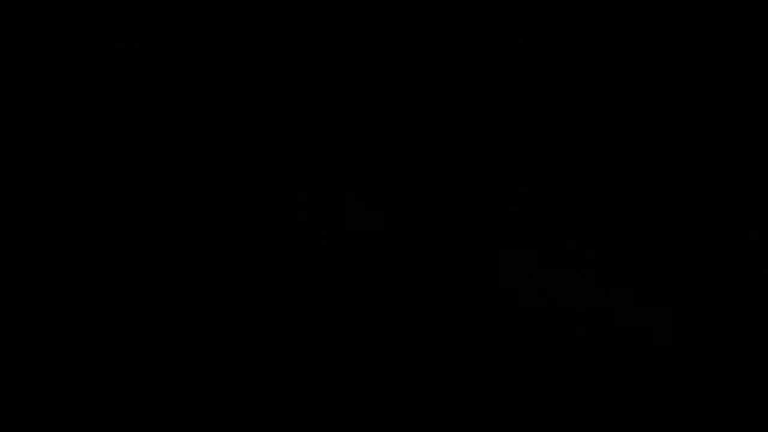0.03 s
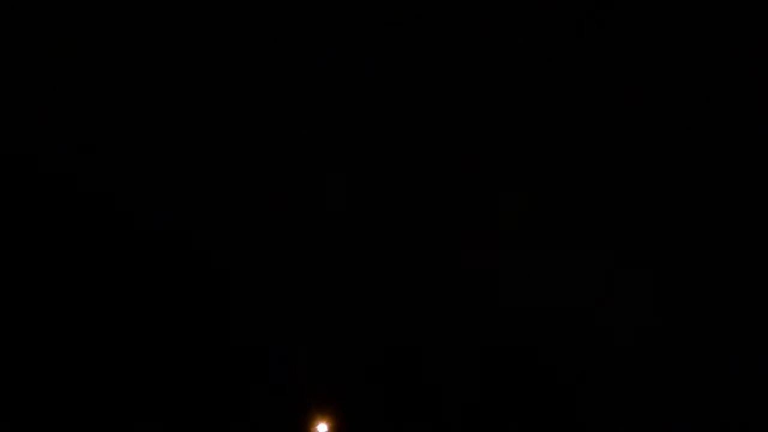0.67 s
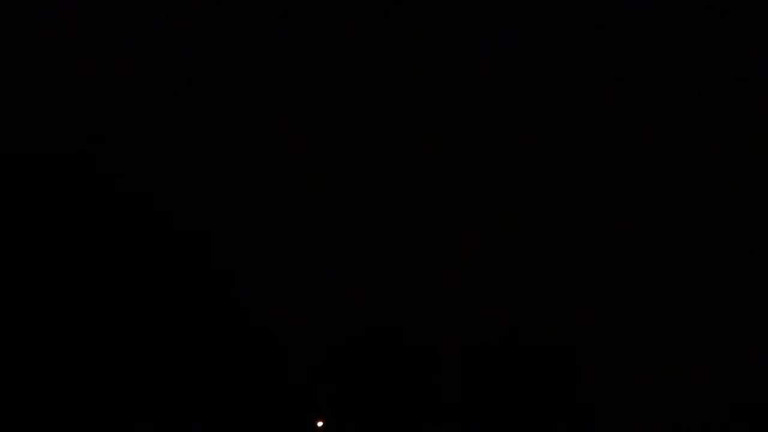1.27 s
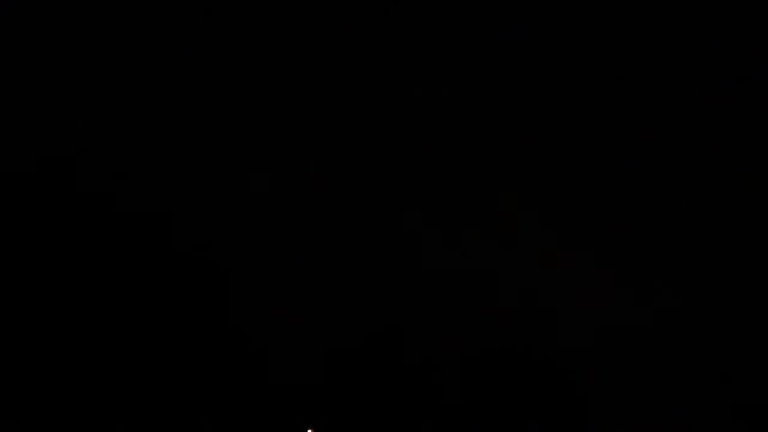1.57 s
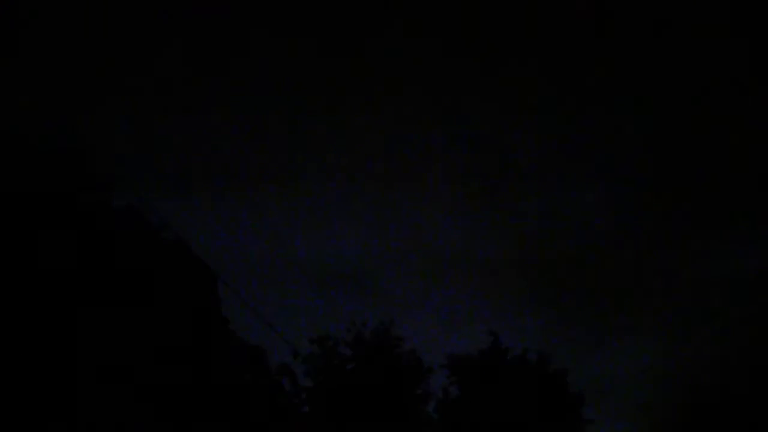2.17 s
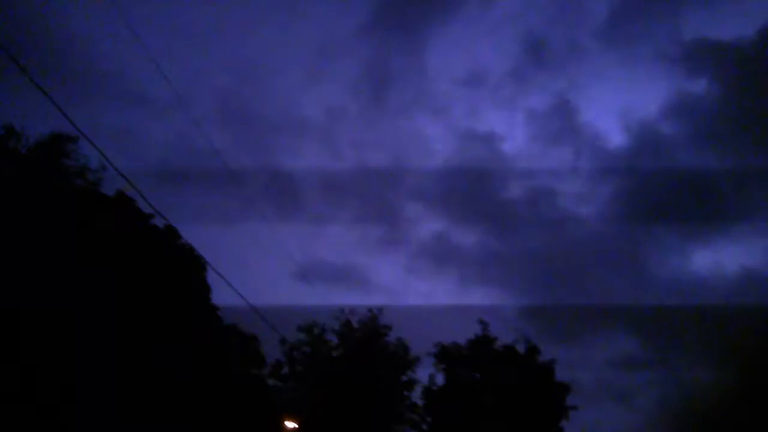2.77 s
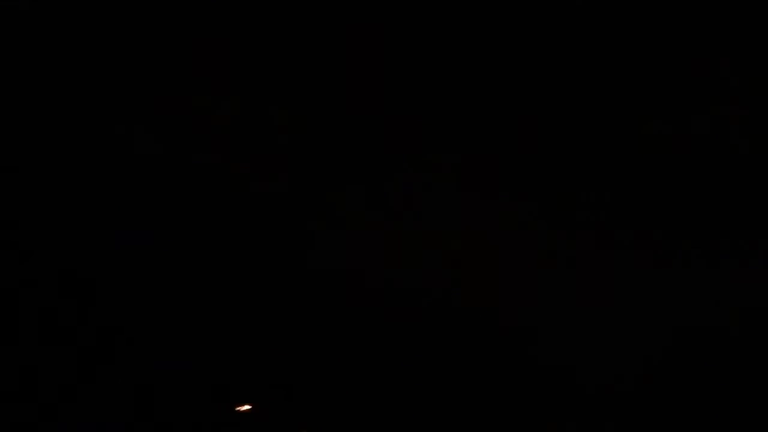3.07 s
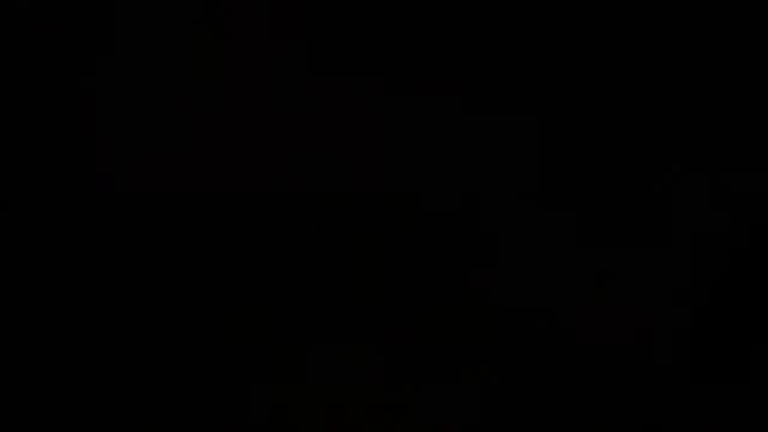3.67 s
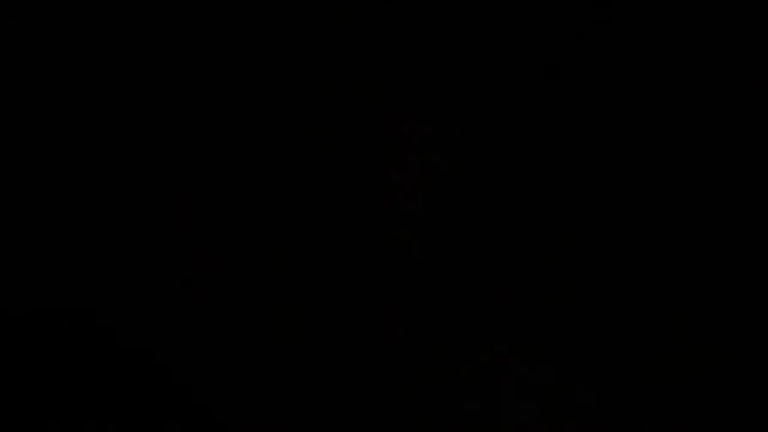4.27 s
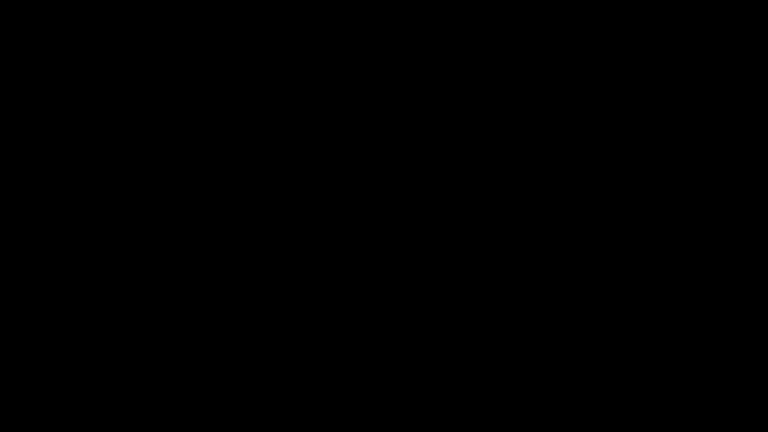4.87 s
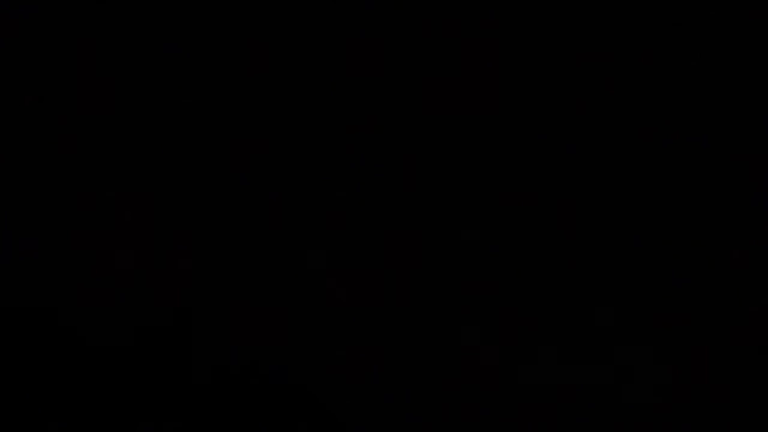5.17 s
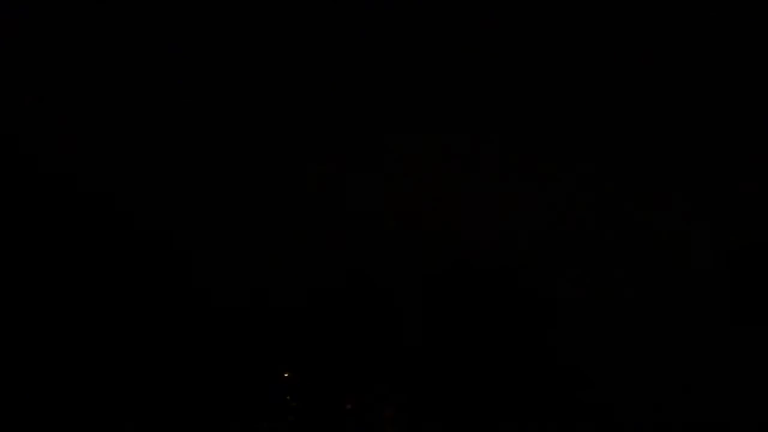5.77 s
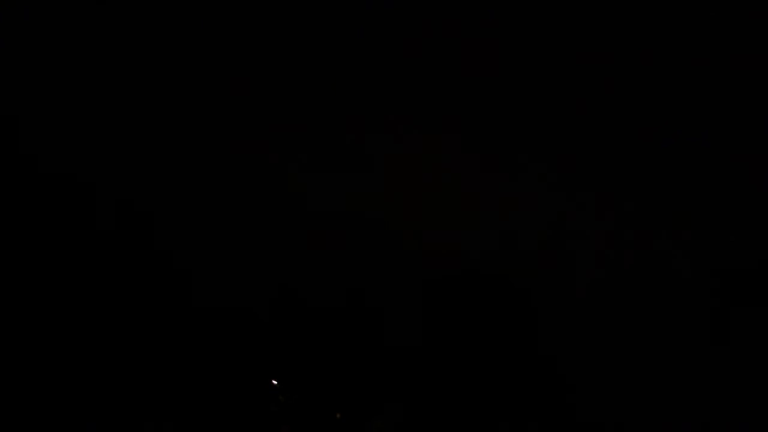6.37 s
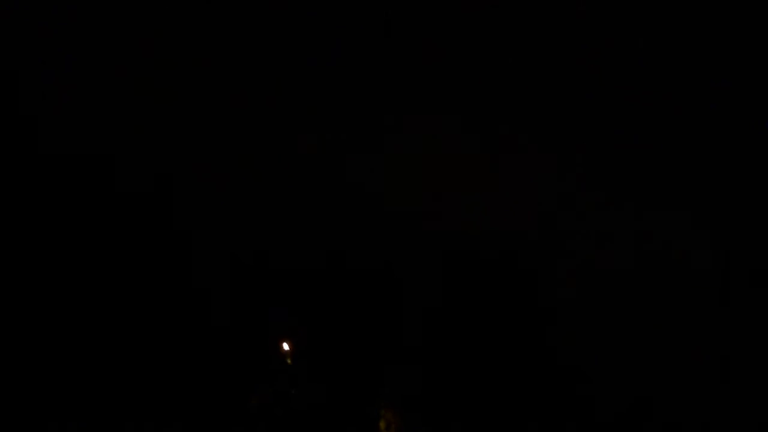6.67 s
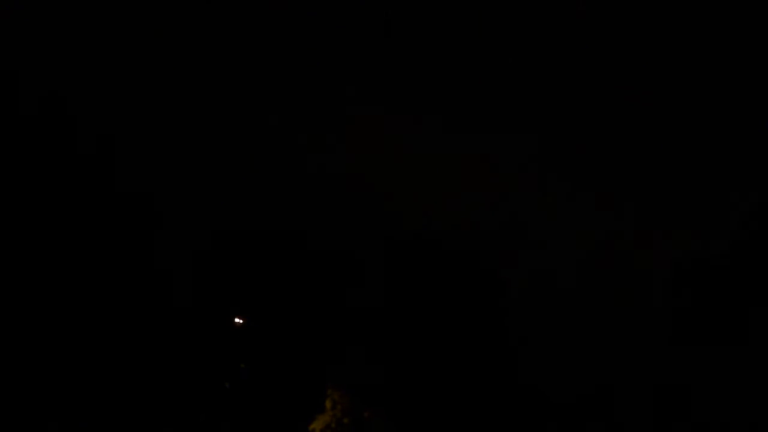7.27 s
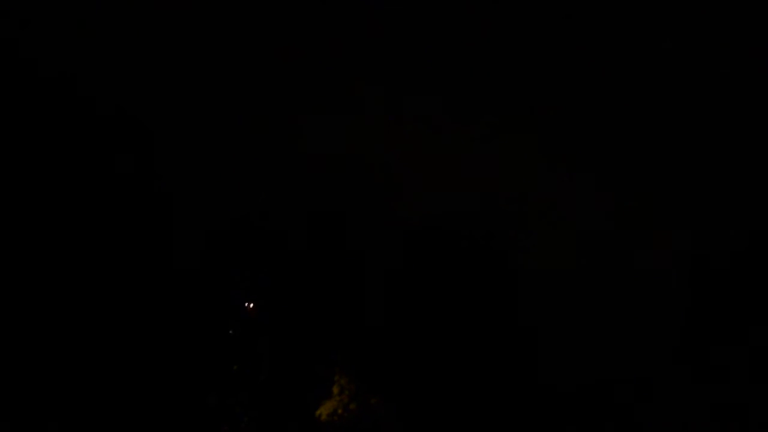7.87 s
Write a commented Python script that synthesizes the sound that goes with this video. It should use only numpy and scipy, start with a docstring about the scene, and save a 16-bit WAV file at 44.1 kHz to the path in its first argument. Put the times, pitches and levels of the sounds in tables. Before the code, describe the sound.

A soft, steady hiss of light rain on trees and ground runs for about eight seconds, heard outdoors at night through one microphone on a hand-held camera. Throughout, large drops land close by at irregular moments, ticking sharply, spattering on leaves and now and then plinking faintly in puddles. Some strike the casing with dull, clicking knocks: one at 0.5 seconds, a loud one at 2.8, another at 3.5, and a run of lighter taps until about 4.3. A bright splash comes at 4.8. Around 5.3 to 5.4 seconds the camera swings round with a short finger rub and a quick cluster of loud bumps; afterwards the hiss is slightly quieter, thinner and brighter. At 5.9 one drop snaps sharply right on the microphone. Scattered ticks continue, with a crisp one near 7.8 seconds.

```python
"""A soft hiss of light night rain on trees and ground, all around a hand-held camera with one microphone.
Close by, large drops tick as they burst, spatter on leaves and plink in puddles; some knock on the casing.
The camera is swung round with a short rubbing jolt, and facing the new way the hiss is thinner and
brighter. Just after the swing, one drop snaps right on the microphone."""
import sys
import numpy as np
from scipy import signal
from scipy.fft import rfft, irfft, next_fast_len
from scipy.io import wavfile
from scipy.ndimage import map_coordinates

SR = 44100
rng = np.random.default_rng(int(sys.argv[2]) if len(sys.argv) > 2 else 0)


def store_pcm(level_fs):
    """Save levels as 16-bit WAV."""
    pcm = np.round(np.clip(level_fs, -1, 1) * 32767).astype(np.int16)
    wavfile.write(sys.argv[1], SR, np.atleast_2d(pcm).T)


N = 349713
TOP_HZ = 15550  # the camera's band limit

# colour of the far rain before the swing: (frequency [Hz], relative level [dB])
HISS_FACING = [(25, -36), (50, -19.5), (100, -10), (180, -4.5), (450, -3), (750, -1), (1200, 0.5),
               (2700, -1.5), (4000, -5.5), (6800, -8.0), (9500, -11), (11500, -15.5), (13300, -19.5),
               (15200, -20.0)]
# colour of the far rain after the swing: (frequency [Hz], relative level [dB])
HISS_TURNED = [(25, -31.5), (50, -20), (100, -9.5), (180, -4), (450, -1.0), (750, -0.5), (1200, 0.0),
               (2700, -3.0), (4000, -6.5), (6800, -7), (9500, -7.0), (11500, -10), (13300, -13.5),
               (15200, -17)]
# slow rise and fall of the hiss's treble: (time [s], gain [dB])
TREBLE_DRIFT = [(0, -.6), (1.2, 0), (2.35, -.4), (2.65, 1.5), (2.9, 1.5), (3.05, -0.5), (3.85, -1.3),
                (4.2, .3), (4.7, .2), (4.9, .8), (5.4, 1.2), (5.7, 0), (7.2, -.5), (7.7, .6)]
# large drops bursting close by: (time [s], level [dB], pitch [Hz], swell [cycles])
NEAR_TICKS = [(.5081, -36, 4200, .6), (.865, -31, 9000, 1.1), (1.179, -36, 2600, 1.8),
              (2.056, -30, 6500, 1.1), (2.4117, -31.5, 7400, 1.4), (2.679, -30, 2930, 2),
              (3.448, -34, 3130, 1.9), (3.727, -27.5, 5800, 1), (3.988, -34, 3300, 1.7),
              (4.080, -34, 3200, 2), (4.094, -29.5, 6000, 1.1), (4.2328, -25.5, 7000, 1),
              (4.3005, -27, 7000, 1), (4.813, -24, 3200, .3), (4.8217, -26, 4400, .6),
              (4.8498, -31, 11500, 1.3), (5.1835, -29, 13000, 1.1), (5.1832, -25.5, 5500, 1),
              (5.2435, -32, 6500, 1), (5.2605, -30, 4200, .8), (6.124, -33, 6800, 1.1),
              (6.5122, -31, 5000, 1.6), (6.9238, -28.5, 10000, .9), (6.9242, -28, 4000, .55),
              (7.116, -32, 9500, 1.1), (7.163, -29, 11000, 1), (7.237, -34, 2400, .8),
              (7.6155, -31, 9000, .7), (7.7825, -28.5, 5100, 1.4), (7.7823, -19.5, 11200, 1.1)]
# bubbles ringing in puddles: (time [s], level [dB], pitch [Hz], swell [cycles])
PUDDLE_PLINKS = [(2.3988, -39, 2950, 3.5), (2.4018, -35, 2800, 3), (4.8216, -34, 4000, 4.5),
                 (4.8271, -31.5, 3150, 3), (7.6276, -37.8, 3300, 3.3)]
# drops breaking up on leaves: (time [s], mean droplet level [dB], centre pitch [Hz], length [s])
LEAF_SPATTERS = [(.86, -43, 9000, .05), (2.054, -42, 4200, .008), (2.412, -43, 7000, .012),
                 (2.85, -40, 6800, .04), (4.288, -40, 3000, .012), (4.44, -41, 3600, .018),
                 (4.8225, -40, 4000, .009), (5.2495, -38.5, 3700, .008), (6.36, -45, 5600, .015),
                 (7.62, -43.5, 4600, .022)]
# blows on the casing from drops and the hand; heavy drops strike twice: (time [s], thud level [dB],
# thud pitch [Hz], thud swell [cycles], boom level [dB], boom pitch [Hz], click level [dB])
CASING_KNOCKS = [(.0706, -32, 407, 1.3, -52, 340, -41), (.434, -38, 520, .8, -50, 340, -40),
                 (.50778, -30, 245, .77, -33, 361, -19), (.51199, -39.6, 445, 1.46, -29, 355, -32),
                 (.8146, -34.5, 600, 0.83, -39, 300, -38), (2.6784, -27.5, 730, 0.41, -44, 340, -28),
                 (2.80269, -24, 631, .88, -14.2, 217, -21.5), (2.80545, -13.5, 411, .65, -13.4, 238, -26),
                 (3.1614, -42, 1350, 1.1, -43, 340, -27), (3.187, -35.5, 610, 1.4, -44, 340, -44),
                 (3.2756, -40, 600, 0.85, -39, 340, -27), (3.310, -33, 860, .65, -41, 340, -38),
                 (3.388, -33.5, 704, .76, -36, 340, -28), (3.4578, -38, 560, .66, -44, 340, -34),
                 (3.4736, -25.5, 797, 1.22, -16.2, 440, -23),
                 (3.47698, -36.3, 565, 1.08, -20.8, 445, -35.3), (3.764, -29, 1100, .85, -39, 340, -34),
                 (3.7683, -32.5, 596, 0.88, -46, 342, -35), (3.9075, -39.5, 620, 1.5, -44, 340, -46),
                 (3.959, -26, 700, .3, -40, 340, -28), (3.9698, -27, 700, 0.45, -44, 340, -23.5),
                 (4.2322, -22.5, 1100, 0.72, -33.5, 400, -33), (4.2996, -26.5, 850, .72, -36, 340, -31),
                 (4.303, -34, 620, .85, -40, 340, -40), (4.343, -39, 600, 1.1, -50, 340, -42),
                 (5.2203, -32, 1200, .85, -50, 340, -36), (5.3005, -34, 620, .9, -42, 340, -36),
                 (5.3363, -32, 700, .85, -38, 340, -32), (5.34331, -27, 315, 1.6, -30.5, 418, -36),
                 (5.35469, -19.2, 435, .91, -25, 200, -32), (5.36247, -22.2, 544, 1.23, -20.2, 368, -28),
                 (5.37361, -16.2, 438, .67, -15.8, 300, -34), (5.37846, -23.1, 435, .86, -34.5, 140, -29),
                 (5.3855, -15.7, 398, .56, -23, 205, -28), (5.39156, -26.8, 801, 1.6, -26.4, 370, -32),
                 (5.8825, -42, 500, 1, -39, 310, -44)]
# modes of the casing's thud: (frequency [ratio to thud pitch], gain [dB])
CASING_MODES = [(1, 0.5), (1.6, -12.5), (2.6, -14.5)]
# the hand slides, then grips: (time [s], level [dB], hold [s])
HAND_RUBS = [(5.276, -46.5, .07), (5.356, -37.5, .036)]
# colour of fingers on the casing: (frequency [Hz], relative level [dB])
RUB_COLOUR = [(40, -24), (100, -24), (160, -3), (205, -2), (270, 5), (335, -1), (420, 0), (600, -1),
              (800, -3), (1300, -7), (2200, -19), (6000, -42)]
# rings of the microphone port: (frequency [Hz], level [dB], swell [cycles])
PORT_RINGS = [(424, -27, 0.45), (1390, -14.5, 0.6), (3080, -12.7, 0.58), (4720, -17, 2.2), (6620, -14, 1.6),
              (9677, -18.5, 2.3), (14310, -19, 1.5)]


def amp(db):
    """Decibels to gain."""
    return 10 ** (np.asarray(db) / 20)


def wobble(rate):
    """A smooth random curve, rate knots a second."""
    knots = rng.standard_normal(int(N * rate / SR) + 4)
    return map_coordinates(knots, [np.arange(N) * rate / SR])


def filtered(x, response):
    """Pass x through a complex response, given as a function of frequency in Hz."""
    size = next_fast_len(N + SR // 2)
    return irfft(rfft(x, size) * response(np.fft.rfftfreq(size, 1 / SR)), size)[:N]


def low_cut(x, hz):
    """Roll off the bass at 12 dB an octave."""
    return filtered(x, lambda f: (1j * f / (hz + 1j * f)) ** 2)


def noise(colour):
    """Noise of rms 1, coloured by (frequency [Hz], relative level [dB]) points."""
    hz, db = np.transpose(colour)
    x = filtered(rng.standard_normal(N), lambda f: amp(np.interp(np.log(f + 1), np.log(hz), db)))
    return x / np.sqrt(np.mean(x ** 2) + 1e-20)


def pings(hz, swell, samples):
    """One heavily damped ring per row: it grows for swell cycles, then dies quickly."""
    turns = hz * np.arange(samples) / SR
    age = turns / np.maximum(swell, 0.1)
    return (age * np.exp(1 - age)) ** 2 * np.sin(2 * np.pi * turns)


def place(times, sounds):
    """Sum rows of sound, each starting at its time in seconds."""
    index = np.round(times * SR).astype(int) + np.arange(sounds.shape[-1])
    return np.bincount(index.ravel(), sounds.ravel(), N)[:N]


def splashes(count, t60_s, band_hz):
    """The spray of one drop per row: a tiny, fading burst of band-limited noise."""
    t = np.arange(SR // 50) / SR
    bursts = rng.standard_normal((count, len(t))) * amp(-60 * t / t60_s)
    return signal.lfilter(*signal.butter(2, band_hz, "bandpass", fs=SR), bursts)


def far_rain(facing_db, turned_db, swing_at_s, swing_length_s, treble_hz, waver_db):
    """Countless distant drops merge into a hiss; its level and colour follow where the microphone points."""
    t = np.arange(N) / SR
    turn = np.clip((t - swing_at_s) / swing_length_s, 0, 1)
    facing = np.sqrt(1 - turn) * amp(facing_db) * noise(HISS_FACING)
    turned = np.sqrt(turn) * amp(turned_db) * noise(HISS_TURNED)
    hiss = facing + turned
    treble = filtered(hiss, lambda f: f ** 2 / (f ** 2 + treble_hz ** 2))
    drift = amp(np.interp(t, *np.transpose(TREBLE_DRIFT)))
    return (hiss - treble + treble * drift) * amp(waver_db * wobble(rate=9))


def patter(count, level_db, spread_db, centre_hz, pitch_spread, swell):
    """Drops land in the middle distance: many faint ones, a few nearer and louder."""
    when, pitch, distance = rng.random((count, 3)).T[:, :, None]
    hz = np.minimum(centre_hz * np.exp(pitch_spread * (2 * pitch - 1)), TOP_HZ)
    nearness = -np.log(distance + 0.05)
    drops = amp(level_db + spread_db * nearness) * pings(hz, swell, samples=256)
    return place(when * N / SR, drops)


def near_ticks(spray_gain_db):
    """Close to the microphone, each large drop bursts with a bright tick and a little spray."""
    times, db, hz, swell = np.transpose(NEAR_TICKS)[:, :, None]
    ticks = amp(db) * pings(hz, swell, samples=512)
    spray = amp(db + spray_gain_db) * splashes(len(times), t60_s=0.013, band_hz=(4000, 11400))
    return place(times, ticks) + place(times, spray)


def puddle_plinks():
    """A drop in standing water traps a small bubble that rings for a few milliseconds."""
    times, db, hz, swell = np.transpose(PUDDLE_PLINKS)[:, :, None]
    return place(times, amp(db) * pings(hz, swell, samples=1024))


def leaf_spatter(droplets_per_drop, pitch_spread, swell):
    """A drop breaks on a leaf into a quick cluster of droplets, each with its own pitch and size."""
    times, db, centre_hz, length = np.repeat(LEAF_SPATTERS, droplets_per_drop, axis=0).T[:, :, None]
    when, pitch, size = rng.random((len(times), 3)).T[:, :, None]
    hz = centre_hz * np.exp(pitch_spread * (2 * pitch - 1))
    droplets = amp(db) * (size + 0.5) * pings(hz, swell, samples=512)
    return place(times + length * when, droplets)


def casing_knocks(click_hz, boom_swell_ratio, spray_gain_db):
    """Each blow on the camera clicks on contact, then the casing gives a dead thud over a lower boom."""
    times, thud_db, thud_hz, swell, boom_db, boom_hz, click_db = np.transpose(CASING_KNOCKS)[:, :, None]
    thud = sum(amp(db) * pings(thud_hz * ratio, swell * ratio, samples=1500)
               for ratio, db in CASING_MODES)
    boom = pings(boom_hz, boom_swell_ratio * swell, samples=1500)
    click = pings(click_hz, swell=0.23, samples=1500)
    blows = amp(thud_db) * thud + amp(boom_db) * boom - amp(click_db) * click
    spray = amp(click_db + spray_gain_db) * splashes(len(times), t60_s=0.006, band_hz=(900, 3900))
    shell = signal.butter(4, 90, "highpass", fs=SR, output="sos")  # a small shell radiates little bass
    body = signal.sosfilt(shell, place(times, blows) + place(times, spray))
    return low_cut(body, hz=140)


def hand_rub(attack_db_per_s, release_db_per_s):
    """Handling noise: fingers drag over the casing as it swings round."""
    pressure = np.zeros(N)
    for start, db, hold in HAND_RUBS:
        t = np.arange(N) / SR - start
        rise_db = attack_db_per_s * np.minimum(t, 0)
        fall_db = release_db_per_s * np.maximum(t - hold, 0)
        pressure += amp(db + rise_db - fall_db)
    return pressure * noise(RUB_COLOUR)


def drop_on_microphone(at_s, spray_db, rebound_delay_s, rebound_db):
    """A drop snaps on the microphone port across the whole band; it sprays, and part falls back softly."""
    snap = sum((-1) ** k * amp(db) * pings(hz, swell, samples=1500)  # rings alternate in sign
               for k, (hz, db, swell) in enumerate(PORT_RINGS))
    spray = amp(spray_db) * splashes(1, t60_s=0.0053, band_hz=(900, 8000))
    rebound = amp(rebound_db) * pings(hz=800, swell=0.38, samples=1500)
    hit = place(at_s, spray) - place(at_s, snap) + place(at_s + rebound_delay_s, rebound)
    return low_cut(hit, hz=160)


def scene():
    """Everything from the far trees to the camera itself reaches one microphone, feeding both channels."""
    rain = far_rain(facing_db=-45, turned_db=-47, swing_at_s=5.32, swing_length_s=0.1,
                    treble_hz=4500, waver_db=0.52)
    rain += patter(count=1300, level_db=-49, spread_db=5.5, centre_hz=7600, pitch_spread=0.66, swell=0.82)
    rain += patter(count=500, level_db=-47.5, spread_db=2.5, centre_hz=2100, pitch_spread=0.81, swell=0.7)
    rain += patter(count=36, level_db=-40, spread_db=2, centre_hz=8800, pitch_spread=0.35, swell=1.1)
    close = near_ticks(spray_gain_db=-10) + puddle_plinks()
    close += leaf_spatter(droplets_per_drop=14, pitch_spread=0.38, swell=1.26)
    camera = casing_knocks(click_hz=1570, boom_swell_ratio=0.8, spray_gain_db=-3)
    camera += hand_rub(attack_db_per_s=900, release_db_per_s=1000)
    camera += drop_on_microphone(at_s=5.8772, spray_db=-21, rebound_delay_s=0.00487, rebound_db=-27.5)
    return np.array([rain + close + camera] * 2)


def record(dry):
    """The camera cuts one narrow notch in the treble and keeps nothing above its band limit."""
    notch_hz, width_hz = 7850, 260
    notch = lambda f: (notch_hz ** 2 - f ** 2) / (notch_hz ** 2 - f ** 2 + 1j * f * width_hz)
    return np.array([filtered(channel, lambda f: notch(f) * (f < TOP_HZ)) for channel in dry])


dry = scene()
out = record(dry)
store_pcm(out)
```